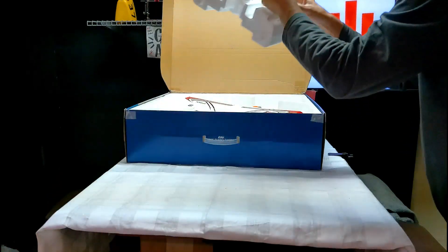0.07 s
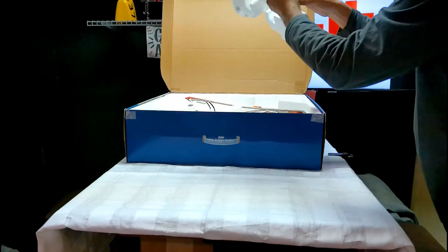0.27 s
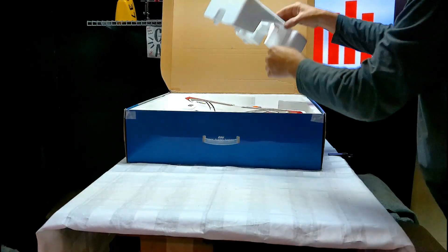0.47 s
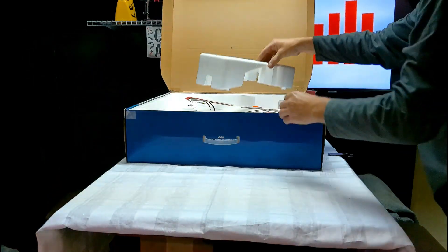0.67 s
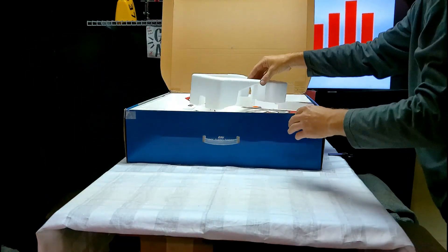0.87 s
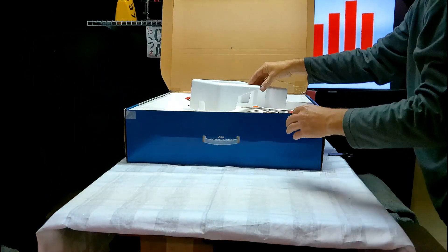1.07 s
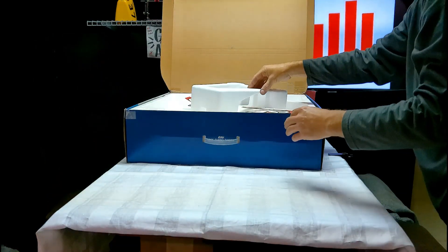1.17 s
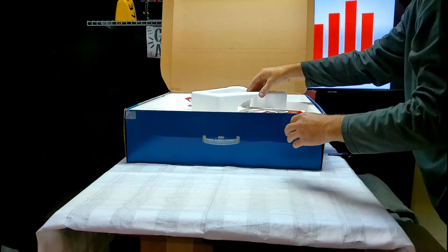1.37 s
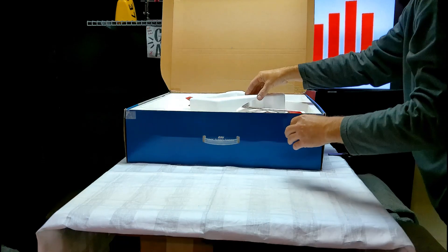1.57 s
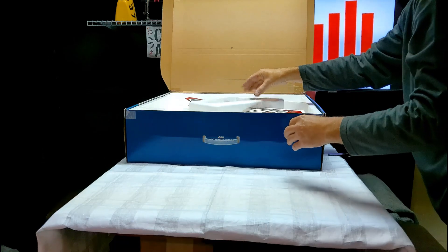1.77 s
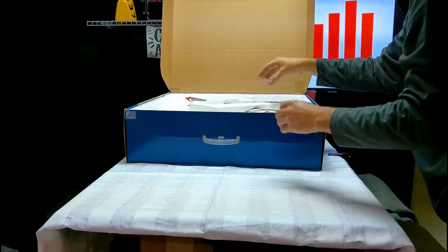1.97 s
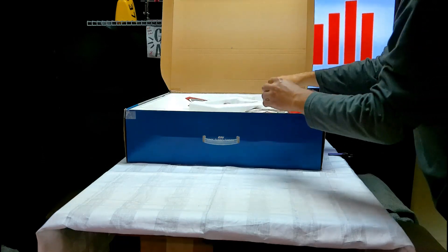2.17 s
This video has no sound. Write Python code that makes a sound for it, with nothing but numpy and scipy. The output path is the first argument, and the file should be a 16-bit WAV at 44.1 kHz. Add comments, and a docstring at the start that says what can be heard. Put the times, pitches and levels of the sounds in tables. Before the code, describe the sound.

Styrofoam block rubs and squeaks dryly, then seats in a cardboard box with a hollow knock

```python
"""Styrofoam insert over a cardboard box

A styrofoam insert is handled over a cardboard box in a small room: it squeaks dryly in the hands, slides down
the cardboard in short strokes, then seats with a hollow, chattering knock. Rubbing is random slips through
colour filters and resonances; squeaks are wavering sine tones; knocks layer damped sines for the block and a
ring with a noise crunch; the room tone is coloured noise."""
import sys
import numpy as np
from scipy import signal
from scipy.fft import rfft, irfft, next_fast_len
from scipy.io import wavfile
from scipy.ndimage import uniform_filter1d, map_coordinates

SR = 44100
rng = np.random.default_rng(int(sys.argv[2]) if len(sys.argv) > 2 else 0)


def dump(signal):
    """Clip the signal to [-1, 1] and save it as 16-bit WAV at the path in sys.argv[1]."""
    limited = np.clip(np.atleast_2d(signal).T, -1, 1)
    pcm = np.round(limited * 32767).astype(np.int16)
    wavfile.write(sys.argv[1], SR, pcm)


N = 97593  # length in samples


def amp(db):
    """Decibels to gain."""
    return 10 ** (np.asarray(db) / 20)


def unit(x):
    """Scale to rms 1."""
    return x / np.sqrt(np.mean(x ** 2) + 1e-20)


def along(points, hz):
    """Read (frequency, value) points on a log frequency axis."""
    f, v = np.transpose(points)
    return np.interp(np.log(hz + 1), np.log(f + 1), v)


def wobble(rate):
    """A smooth random curve, rate knots a second."""
    knots = rng.standard_normal(N // 10)
    return map_coordinates(knots, [np.arange(N) * rate / SR], mode="mirror")


def response(spectrum, size=8192):
    """Minimum-phase impulse response of energy 1 with the given colour."""
    log_gain = np.log(amp(along(spectrum, np.fft.rfftfreq(size, 1 / SR))))
    # folding the cepstrum onto positive times makes the filter causal
    cepstrum = irfft(log_gain)
    cepstrum[1:size // 2] *= 2
    cepstrum[size // 2 + 1:] = 0
    impulse = irfft(np.exp(rfft(cepstrum)))
    return impulse / np.linalg.norm(impulse)


def colour(x, spectrum):
    """Shape the spectrum of x with a causal filter."""
    return signal.fftconvolve(x, response(spectrum))[:len(x)]


def resonate(x, peaks):
    """Ring x through parallel resonances of alternating sign."""
    size = next_fast_len(N + SR // 2)
    f = np.fft.rfftfreq(size, 1 / SR)
    gain = 0
    for k, (hz, width, db) in enumerate(peaks):
        damping = 1j * f * width
        gain = gain + (-1) ** k * amp(db) * damping / (hz * hz - f * f + damping)
    return irfft(rfft(x, size) * gain, size)[:N]


def add(track, s, sound):
    """Mix a sound in at time s."""
    i = max(round(s * SR), 0)
    track[i:i + len(sound)] += sound[:N - i]


# Decay of the small room: frequency_hz, t60_s
ROOM_DECAY = [(150, 0.22), (600, 0.18), (2000, 0.18), (6000, 0.16), (14000, 0.18)]
ROOM_GAP_S = .014  # time scale over which the tail builds up


def in_room(x, wet_db):
    """Add a diffuse noise tail in which each frequency dies at its own speed."""
    hz, t, z = signal.stft(rng.standard_normal(SR // 2), SR, nperseg=256)
    decay = amp(-60 * t / along(ROOM_DECAY, hz)[:, None])
    tail = signal.istft(z * decay, SR, nperseg=256)[1]
    tail = tail * (1 - np.exp(-(np.arange(len(tail)) / SR / ROOM_GAP_S) ** 2))
    tail = tail / np.linalg.norm(tail)
    return x + amp(wet_db) * signal.fftconvolve(x, tail)[:len(x)]


# Colour of the room tone: frequency_hz, level_db
ROOM_TONE_COLOUR = [(20, -16.5), (33, -21.5), (64, -21.5), (200, -28), (350, -33.5), (550, -38.5),
                    (800, -43.5), (1500, -49.5), (4000, -55), (9000, -58), (15500, -57.5)]
ROOM_TONE_DB = -53.5


def room_tone():
    """A low, steady rumble with faint hiss, from coloured noise."""
    noise = rng.standard_normal(N + SR)
    return amp(ROOM_TONE_DB) * unit(colour(noise, ROOM_TONE_COLOUR)[SR:])  # skips the filter's start


# Brief squeaks of the beads: start_s, length_s, pitch_hz
BEAD_SQUEAKS = [(.229, .04, 9050), (.35, .025, 7300)]
# Level of each squeak in turn: level_db
SQUEAK_LEVELS = [-51, -43]
PITCH_WAVER_HZ, LEVEL_WAVER_DB = 220, 1.7
RUB_ROOM_DB = -8.5  # room tail on squeaks and rubbing


def squeaks():
    """Each squeak is a short, high sine of unsteady pitch and level."""
    out = np.zeros(N)
    for (s, length, hz), db in zip(BEAD_SQUEAKS, SQUEAK_LEVELS):
        window = signal.windows.tukey(int(length * SR), .5)
        pitch = hz + PITCH_WAVER_HZ * wobble(1419)
        tone = np.sin(2 * np.pi * np.cumsum(pitch) / SR) * amp(LEVEL_WAVER_DB * wobble(360))
        add(out, s, amp(db) * window * tone[:len(window)])
    return in_room(out, RUB_ROOM_DB)


SLIPS_PER_S, SLIP_SPREAD_DB = 3500, 4.5
SMOOTH_SHARE = .8  # smooth drag noise against the slips, rms ratio


def slips(judder):
    """Dense random slips of uneven size and either sign, on a smooth drag, under the judder gain."""
    happens = rng.random(N) < SLIPS_PER_S / SR
    size = amp(SLIP_SPREAD_DB * rng.standard_normal(N))
    grains = happens * size * rng.choice([-1, 1], N)
    return judder * (unit(grains) + SMOOTH_SHARE * rng.standard_normal(N))


PATCHY_DB = 2  # rms depth


def patchy(x):
    """Random gain over time and frequency, making the rubbing noise uneven."""
    z = signal.stft(x, nperseg=512)[2]
    field = uniform_filter1d(rng.standard_normal(z.shape), size=4, axis=0)  # across frequency
    field = uniform_filter1d(field, size=6, axis=1)  # across time
    return signal.istft(z * amp(PATCHY_DB * unit(field)), nperseg=512)[1][:N]


# Strokes of foam: start_s, rise_s, length_s (start to release), bead_hiss_db, rasp_db, hollow_body_db
FOAM_STROKES = [(0.0, 0.0046, 0.032, -62, -47, -42), (0.031, 0.0018, 0.0096, -49, -42, -43.5),
                (.06, 0.0064, 0.017, -71.5, -66, -48), (0.117, 0.01, 0.016, -60.5, -62, -49.5),
                (0.138, 0.0075, 0.02, -49.5, -53.5, -57), (0.181, 0.0028, 0.039, -76.5, -65, -53),
                (0.227, .003, 0.032, -47, -52.5, -53), (0.26, 0.0069, 0.043, -68, -54.5, -54.5),
                (0.327, .005, 0.017, -56.5, -60, -59), (0.348, 0.0099, 0.027, -40, -49, -55.5),
                (1.241, 0.0054, 0.031, -61.5, -74, -80.5), (1.268, 0.0161, 0.058, -56.5, -57.5, -60.5),
                (1.338, 0.026, 0.0407, -52, -57.5, -53.5), (1.414, 0.034, 0.13, -62.5, -63, -71),
                (1.467, 0.028, 0.095, -52, -57, -59.5), (1.538, 0.02, 0.0183, -44.5, -54.5, -58),
                (1.599, 0.0062, 0.06, -56, -53.5, -57), (1.661, 0.0063, 0.11, -62.5, -61, -75),
                (1.743, 0.044, 0.065, -44.5, -45.5, -51), (1.795, 0.0117, 0.13, -52, -52, -47)]
# Colour of the bead hiss: frequency_hz, level_db
HISS_COLOUR = [(1500, -9.5), (4000, -12), (6000, -5.5), (7500, -0.5), (10000, 1), (12500, -3), (15500, -10)]
# Colour of the rasp on the card: frequency_hz, level_db
RASP_COLOUR = [(300, -1.5), (900, -1.5), (1300, 1.5), (2200, 0.5), (3500, 2), (5000, 1), (8000, -9),
               (15000, -24.5)]
# Resonances of the rubbed block: frequency_hz, width_hz, level_db
FOAM_RESONANCES = [(176.5, 24, 5.5), (304, 66, -2.5), (384, 80, -3.5), (579, 42, 2.5), (717, 41, 0.5),
                   (792, 40, -2.5), (856.7, 21, -2.5), (1005, 30, -5.5), (1445, 72, -16), (2024, 42, -7.5)]
RELEASE_S = 0.087  # t60 of a stroke's end
JUDDER_DB = 0  # at 0 the drag is even, with no judder


def friction():
    """Foam beads stick and slip at random; the slips hiss, rasp on the card and sound the hollow block."""
    t = np.arange(N) / SR
    shapes = []
    for s, rise, length, *_ in FOAM_STROKES:
        attack = np.clip((t - s) / rise, 0, 1)
        release = amp(-60 * np.maximum(t - s - length, 0) / RELEASE_S)
        shapes.append(attack * release)
    # overlapping strokes add in power
    stroke_gains = amp(np.array(FOAM_STROKES)[:, 3:])
    hiss, rasp, body = np.sqrt(stroke_gains.T ** 2 @ np.array(shapes) ** 2)
    judder = amp(JUDDER_DB * wobble(130))
    surface = hiss * unit(colour(slips(judder), HISS_COLOUR))
    surface = surface + rasp * unit(colour(slips(judder), RASP_COLOUR))
    surface = patchy(surface)
    hollow = body * unit(resonate(slips(judder), FOAM_RESONANCES))
    return in_room(surface + hollow, RUB_ROOM_DB)


def swell(t, rise, t60):
    """A soft onset under an exponential decay."""
    return (1 - np.exp(-t / rise)) * amp(-60 * t / t60)


# Single contacts of foam and box: start_s, thud_db, thud_pitch_hz, crunch_db
BOX_CONTACTS = [(0.0189, -51, 760, -32.5), (.035, -35, 794, -35.5), (0.099, -30, 879, -73),
                (.962, -45, 630, -75), (1.018, -44.5, 626, -93), (1.349, -29, 442, -72.5),
                (1.601, -26, 543, -56), (1.795, -17, 427, -71), (1.854, -15.5, 476.2, -50),
                (1.898, -1.5, 456, -26.5), (1.909, -13, 580, -31.5), (1.924, -11, 650, -41)]
# Beats of the chatter as the block seats: thud_db, crunch_db
SEATING_BEATS = [(9, -17.5), (4, -18.5), (-7, -23.5)]
# Broad resonances of the block: multiple_of_thud_pitch, level_db
BLOCK_MODES = [(.4, -14), (0.799, -10), (0.999, -3.5), (1.35, -6), (1.8, -14)]
# Tones that ring on after each contact: frequency_hz, level_db, t60_s
RING_MODES = [(207.7, -7, 0.1), (256.6, -10, 0.14), (346.6, -3, .19), (437.95, 2.5, 0.11), (547, 1, 0.092),
              (580, -10.5, 0.13), (675.7, -7, 0.122), (701, -5, 0.23), (776, -3.5, 0.16), (905, -9.5, .17),
              (1196, -12, 0.18), (1352, -10.5, .16), (1550, -8.5, 0.068), (2125.6, -15, .14)]
# Colour of the bead crunch: frequency_hz, level_db
CRUNCH_COLOUR = [(200, -36.5), (500, -30.5), (1000, 19.5), (1500, 15), (2200, 13.5), (3200, 3), (4500, 1),
                 (7500, -7), (11000, -8), (15500, -25.5)]
SEAT_S, CHATTER_S, SEAT_HZ = 1.8662, .00905, 540  # first beat, even spacing, thud pitch
THUD_RISE_S, THUD_T60_S = .004, .026
CRUNCH_RISE_S, CRUNCH_T60_S = 0.0026, 0.053
RING_DB, RING_RISE_S = -31.5, 0.0017  # ring against the thud
LOW_CUT_HZ = 233  # the box radiates little below this
KNOCK_ROOM_DB = -10


def knocks():
    """Each contact is a damped thud of the block, a crunch of beads and a short ring."""
    out, t = np.zeros(N), np.arange(SR // 2) / SR
    seating = [(SEAT_S + k * CHATTER_S, thud_db, SEAT_HZ, crunch_db)
               for k, (thud_db, crunch_db) in enumerate(SEATING_BEATS)]
    for s, thud_db, thud_hz, crunch_db in BOX_CONTACTS + seating:
        thud = sum(amp(db) * np.sin(2 * np.pi * k * thud_hz * t) for k, db in BLOCK_MODES)
        thud = thud * swell(t, THUD_RISE_S, THUD_T60_S)
        # t + s keeps each ringing tone in phase from one contact to the next
        ring = sum(amp(db) * swell(t, RING_RISE_S, t60) * np.sin(2 * np.pi * hz * (t + s))
                   for hz, db, t60 in RING_MODES)
        crunch = unit(colour(rng.standard_normal(len(t)), CRUNCH_COLOUR))
        crunch = crunch * swell(t, CRUNCH_RISE_S, CRUNCH_T60_S)
        add(out, s, amp(thud_db) * (thud + amp(RING_DB) * ring) + amp(crunch_db) * crunch)
    low_cut = signal.butter(2, LOW_CUT_HZ, "high", fs=SR, output="sos")
    return in_room(signal.sosfilt(low_cut, out), KNOCK_ROOM_DB)


def scene():
    """Rubbing, squeaks and knocks over the quiet of the room."""
    return (friction() + squeaks() + knocks() + room_tone())[None]


TOP_HZ = 15750  # band limit
OFFSET = .029  # steady offset of the microphone, full scale 1


def record(dry):
    """Cut everything from the band limit up and add the microphone's steady offset."""
    size = next_fast_len(N + SR // 2)
    passband = np.fft.rfftfreq(size, 1 / SR) < TOP_HZ
    return irfft(rfft(dry, size) * passband, size)[:, :N] + OFFSET


dry = scene()
out = record(dry)
dump(out)
```